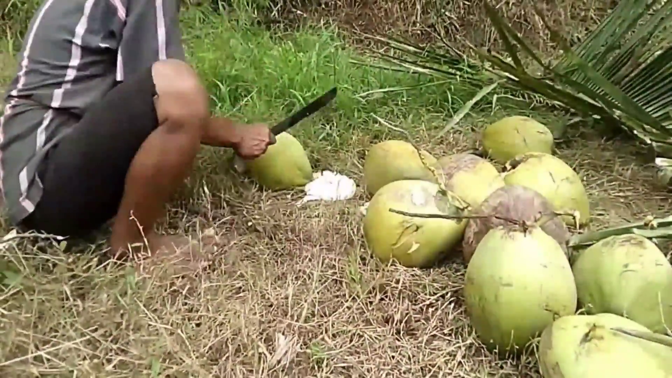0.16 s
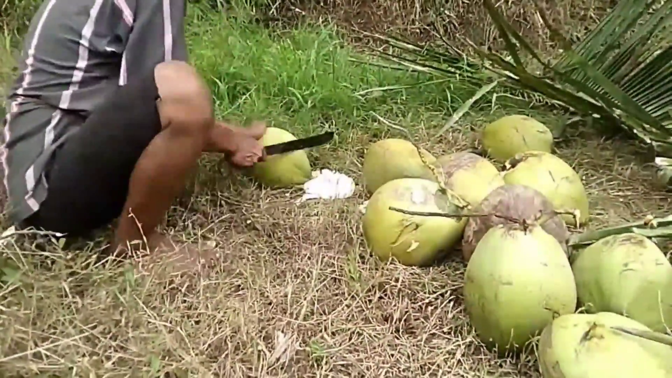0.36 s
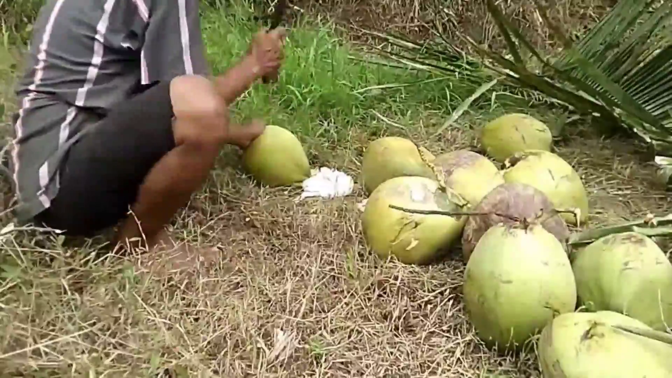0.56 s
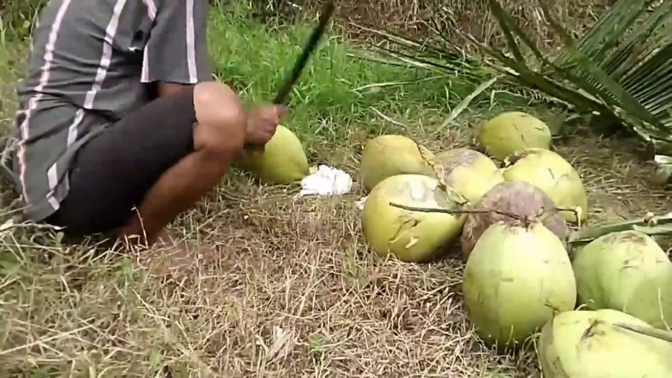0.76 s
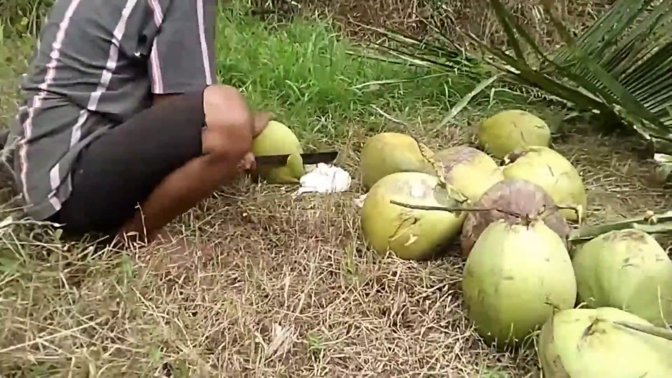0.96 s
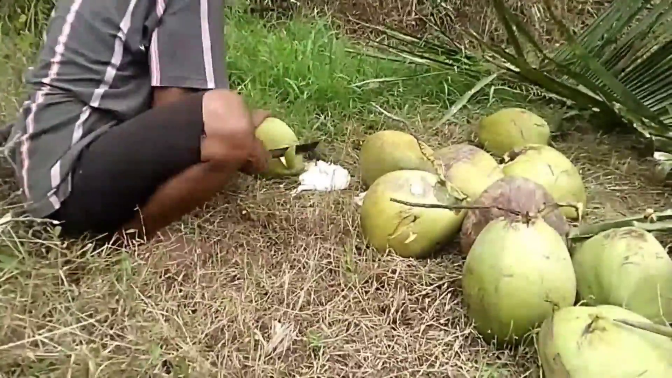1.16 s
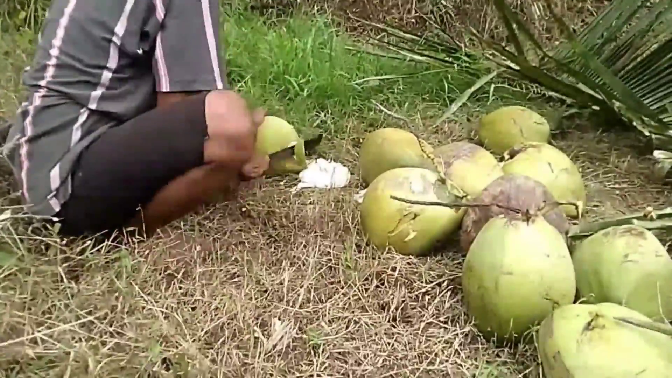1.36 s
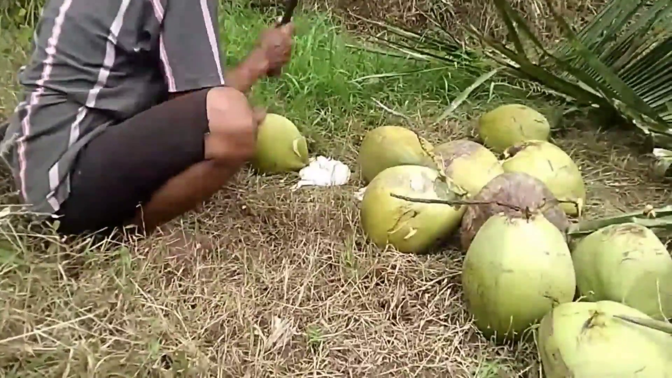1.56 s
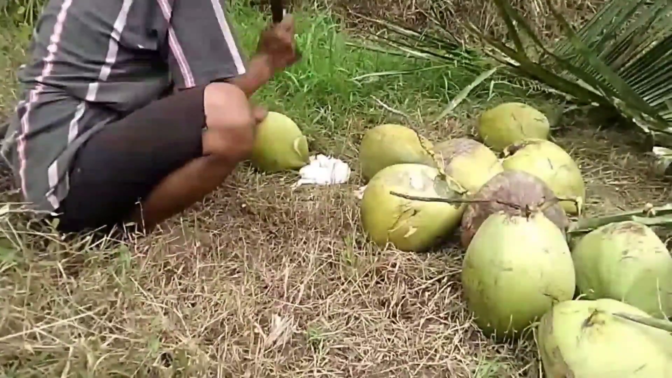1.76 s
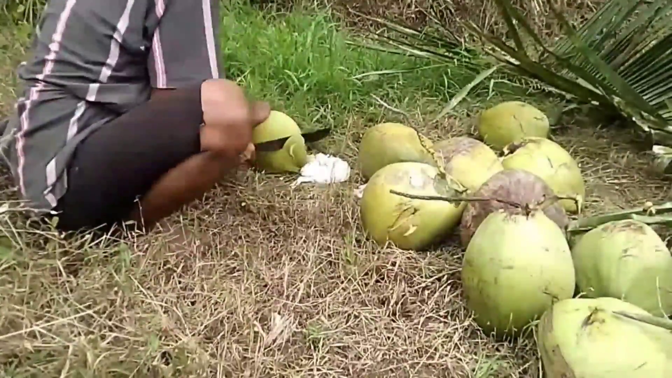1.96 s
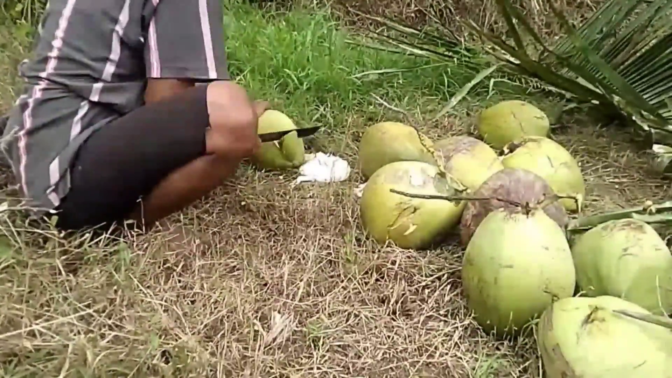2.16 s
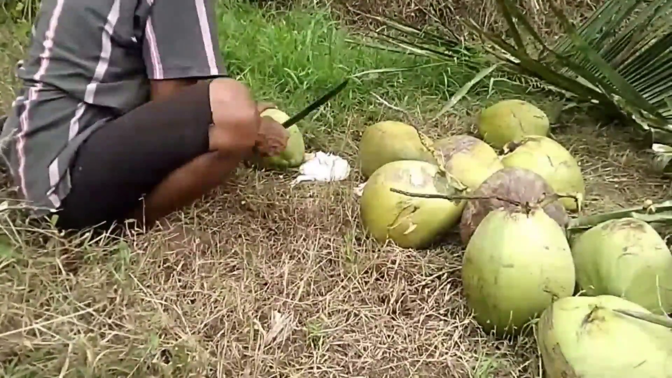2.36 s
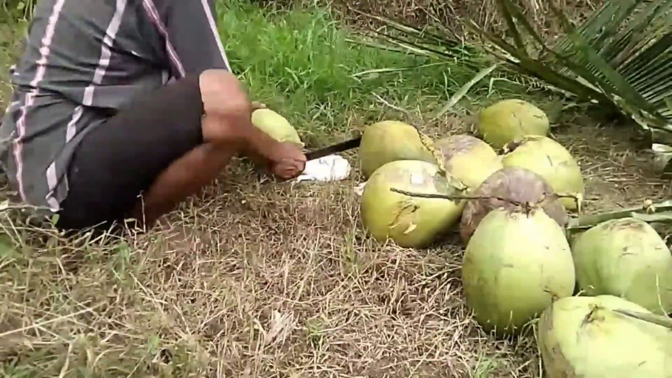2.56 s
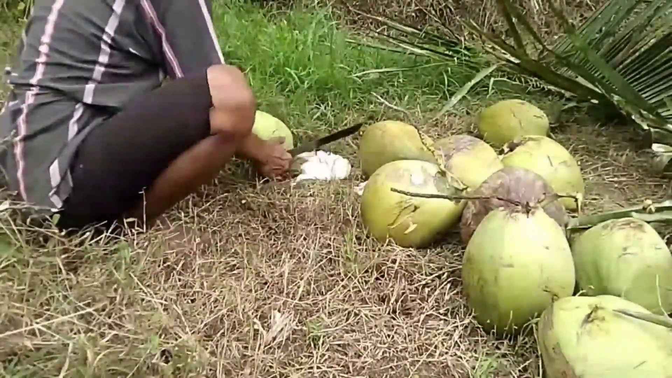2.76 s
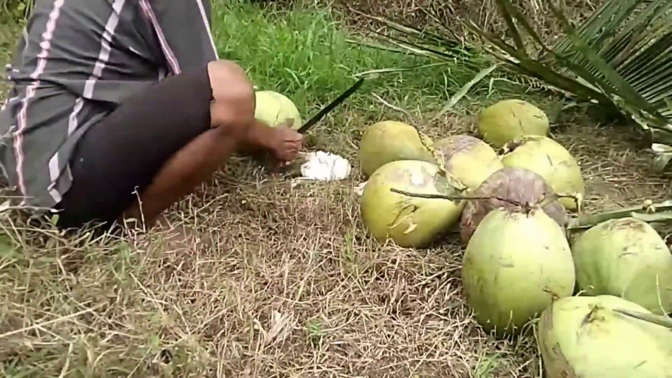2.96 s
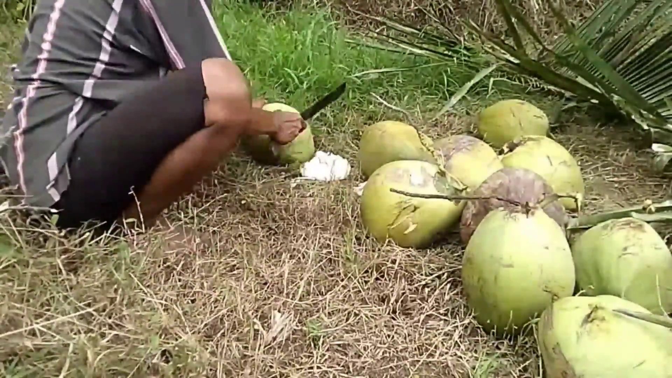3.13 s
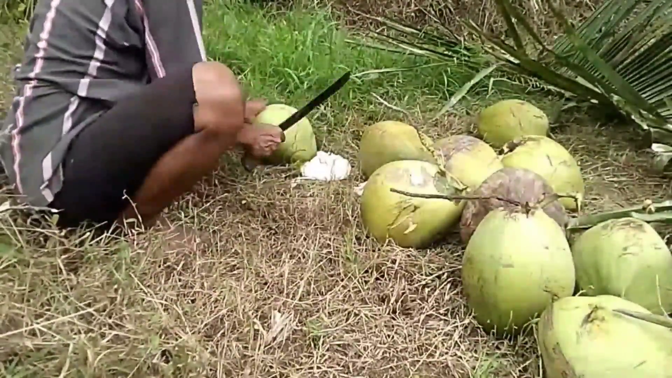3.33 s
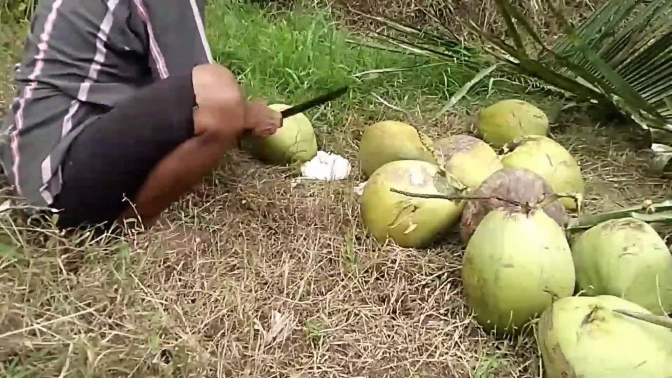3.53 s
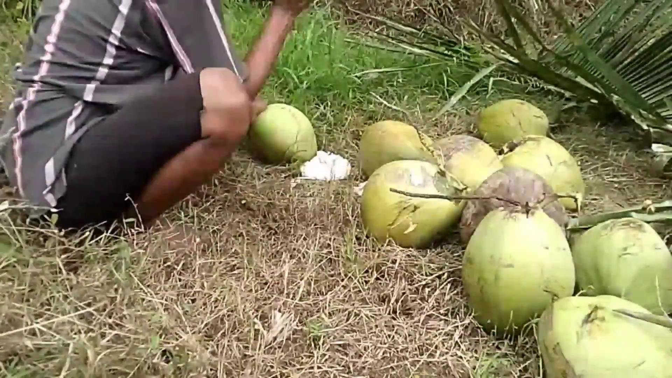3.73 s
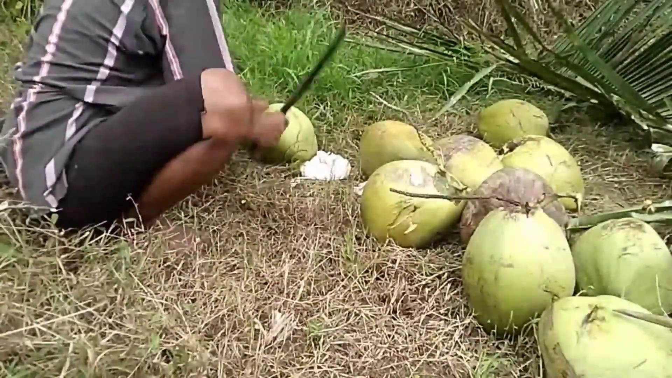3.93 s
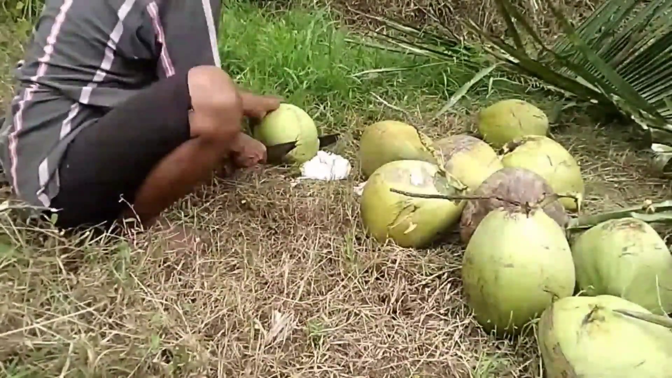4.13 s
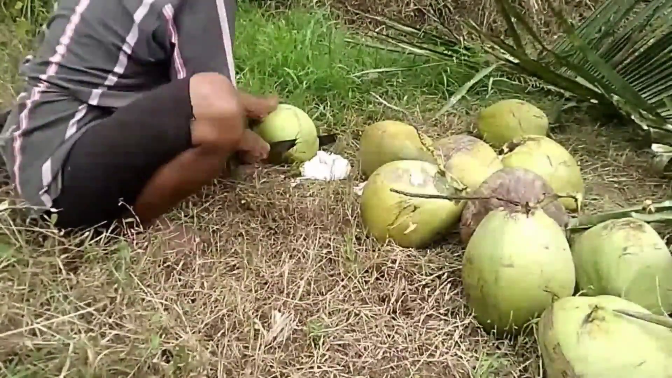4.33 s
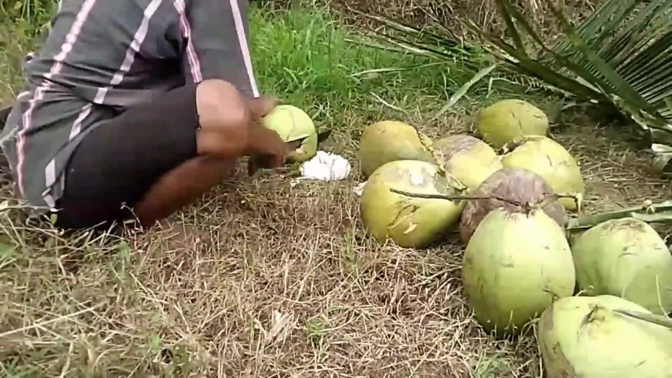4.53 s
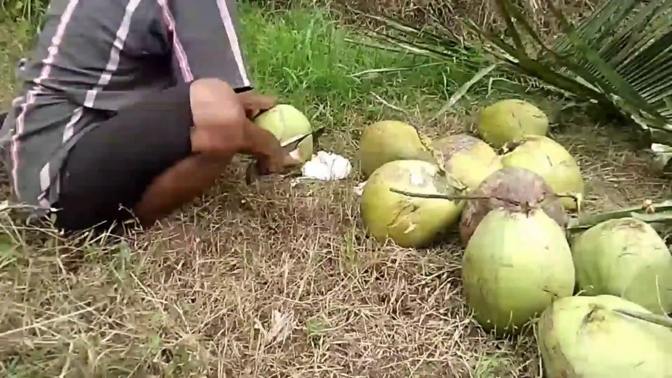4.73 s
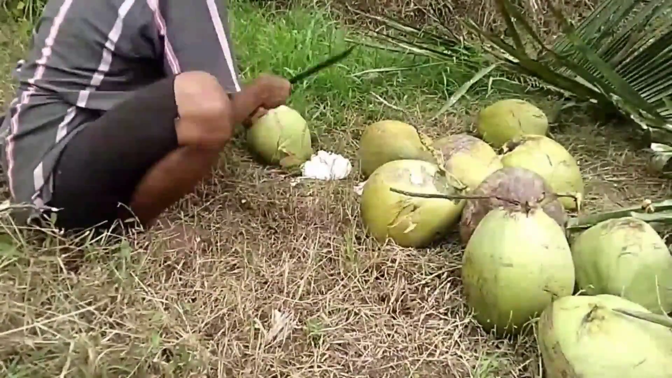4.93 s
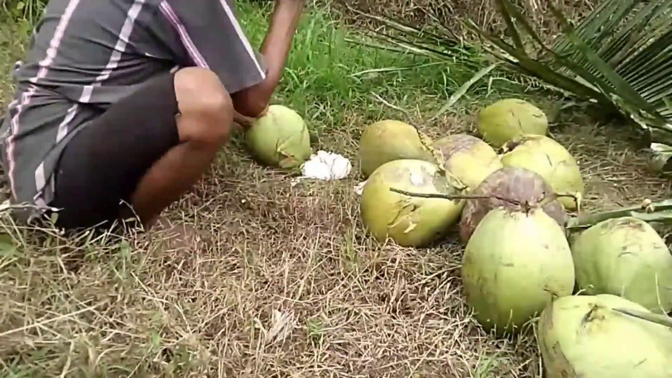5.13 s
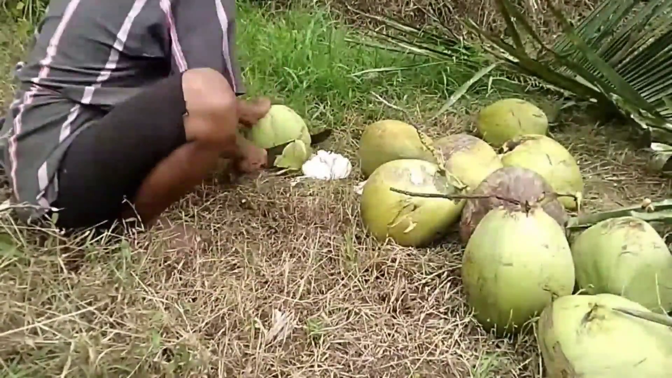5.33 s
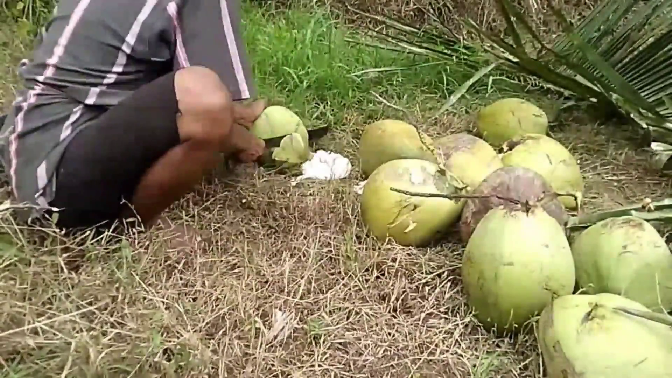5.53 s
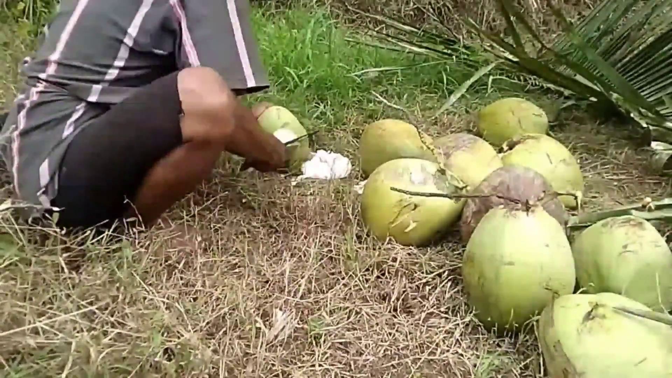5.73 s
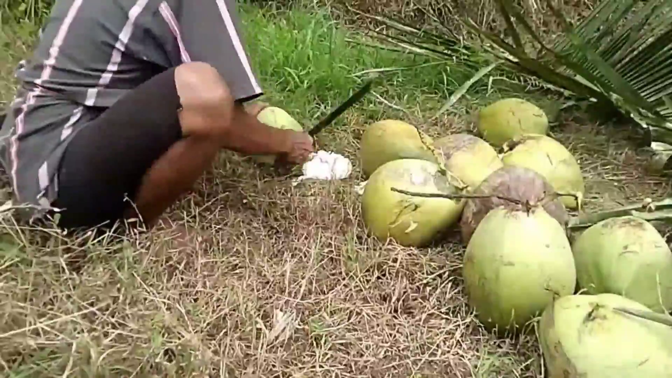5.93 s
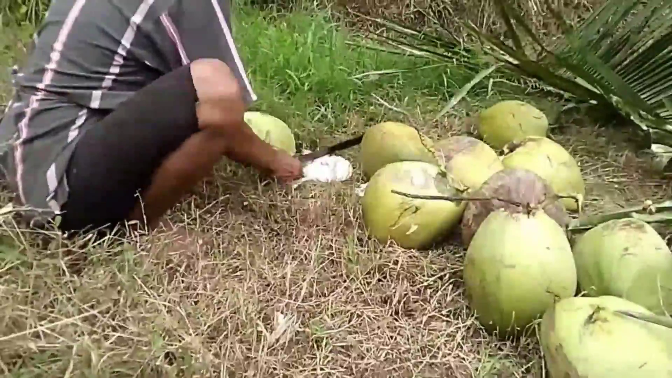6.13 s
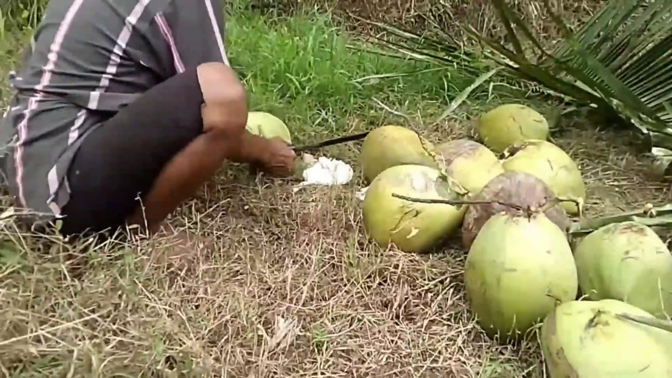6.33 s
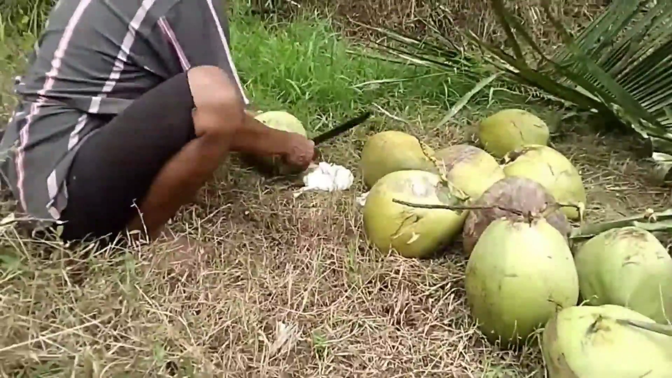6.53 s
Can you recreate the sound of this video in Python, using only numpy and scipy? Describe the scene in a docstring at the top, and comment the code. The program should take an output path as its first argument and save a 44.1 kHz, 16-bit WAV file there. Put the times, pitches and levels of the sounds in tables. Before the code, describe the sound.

Faint grass rustling and a distant bird whistle come first, then a weak machete tap and stronger chops into a moist coconut husk. Levered fibres crackle and rip after several cuts, the nut is shifted with low knocks, and more chops follow, ending in a brittle tear. High katydid whine and fading hiss continue throughout, with low wind rumble on the microphone. Open air, fairly close, dry, with a brief scatter from bushes.

```python
"""Insects whine over hiss and a breeze that swells, gusts once and fades; grass rustles, a knock, a far whistle.
Then six machete blows on a green coconut: filtered modes thud in the nut, and the husk cracks as shaped noise.
After four of them the blade prises the fibres apart: clumped random pings, fizz, rasp and single snaps.
Straw ticks, soft knocks, insect buzzes and two more whistles fall in between.
Grass and bushes scatter the work and the bird through noise echoes."""
import sys
import numpy as np
from scipy import signal
from scipy.fft import rfft, irfft
from scipy.io import wavfile
from scipy.ndimage import uniform_filter1d

SR = 44100
rng = np.random.default_rng(int(sys.argv[2]) if len(sys.argv) > 2 else 0)


def master_out(mix):
    """Clip the mix to full scale and print it as 16-bit PCM to the path in sys.argv[1]."""
    frames = np.transpose(np.atleast_2d(mix))
    ceiling = np.clip(frames, -1, 1)
    pcm = np.round(ceiling * 32767).astype(np.int16)
    wavfile.write(sys.argv[1], SR, pcm)


N = 290619
TIME_S = np.arange(N) / SR

# hiss colour: f/Hz, relative density/dB
HISS_SHAPE = [(300, -3), (700, -29), (1200, -19), (2000, -12), (2700, -4), (4000, -13.5), (5800, -13),
              (8000, -0.5), (10500, 4.5), (12500, 1), (15300, 11.5)]
# hiss level before its flicker: t/s, level/dB
HISS_LEVEL = [(0, -48.5), (1.1, -51.5), (2.6, -54), (4.2, -57.5), (6.59, -57.5)]
# breeze rumble colour: f/Hz, relative density/dB
RUMBLE_SHAPE = [(15, -11.5), (35, -4.5), (60, 2), (130, 7), (200, -2.5), (300, -10.5), (430, -28),
                (900, -60)]
# breeze strength: t/s, relative level/dB
BREEZE = [(0, -11), (1.2, 1.5), (3.1, 3.5), (3.8, -3.5), (4.7, -5), (6.1, -12), (6.59, -18)]
GUST_AT_S, GUST_HALF_S, GUST_DB = 3.26, .12, 13
PUFFS_DB, RUMBLE_DB = -64.5, -62.5  # at breeze 0 dB
RUMBLE_SHARE = 0.21  # of the breeze's dB swings

# near katydids: crest t/s, cycle/s, crest f/Hz, drift over the scene/Hz, first and last mean level/dB
KATYDIDS = [(.36, 1.065, 14060, -200, -50.5, -67), (.62, 1.115, 13960, 60, -60, -64),
            (1.1, 1.1, 13900, -30, -64, -63), (.2, 1.1, 13760, -200, -67, -69),
            (0, 1.1, 13330, -70, -77, -70.5)]
KATYDID_SWING_HZ, KATYDID_RISE = 190, .36  # rise: share of the cycle
FAR_KATYDID_LOW_HZ, FAR_KATYDID_HIGH_HZ = 13250, 14400  # range of crests
FAR_KATYDID_FIRST_DB, FAR_KATYDID_LAST_DB = -69, -76
# steady flickering noise bands: f/Hz, width/Hz, mean level/dB
NOISE_BANDS = [(3364, 130, -79.5), (3522, 130, -77), (4703, 380, -78.5), (6890, 400, -80.5),
               (13650, 850, -73)]
# short insect buzzes: t/s, length/s, level/dB
BUZZES = [(1.638, 0.2, -63), (1.891, 0.13, -65), (4.173, 0.2, -62.5)]

# feet and hands shifting in dry grass: middle t/s, half length/s, level/dB
SHUFFLES = [(0.112, 0.097, -69.5), (0.744, 0.44, -75), (1.39, 0.33, -77.5), (2.375, 0.059, -64.5),
            (2.74, 0.12, -65.5), (2.99, 0.091, -71), (3.194, 0.21, -83), (4.94, 0.72, -86)]
RUSTLE_FLOOR_DB = -78

# nut turned and set down: t/s, level/dB, centre f/Hz, decay/s
KNOCKS = [(0.1177, -62, 1390, .01), (2.5452, -63, 510, .02), (2.655, -53, 800, .005),
          (2.664, -53.5, 1400, .005), (2.699, -48, 130, .012), (2.705, -53, 1100, .003),
          (2.8081, -56, 750, .016), (3.188, -44, 65, .02), (3.242, -46, 110, .025), (3.318, -50, 100, .015),
          (4.6529, -45, 510, .007), (4.69, -45.5, 497, .012), (5.097, -61, 1150, .005),
          (5.115, -63, 1200, .009)]
# thick fibres and bundles snapping: t/s, level/dB, centre f/Hz, decay/s
SNAPS = [(1.2008, -46, 9000, .003), (1.216, -47, 3900, .004), (1.2385, -38.5, 3900, .004),
         (1.257, -40, 10500, .004), (1.2722, -37, 9500, .003), (1.283, -39, 3800, .002),
         (1.296, -41, 3900, .002), (1.3125, -41, 12000, .002), (2.2605, -41, 2850, .006),
         (2.2805, -38.5, 2780, .007), (2.2895, -43, 9000, .002), (2.302, -44, 2950, .008),
         (2.3222, -39.5, 2800, .004), (2.323, -42, 9500, .003), (2.3427, -41, 8500, .003),
         (4.4935, -45, 9000, .002), (4.525, -43, 11500, .002), (4.581, -37, 3200, .002),
         (4.6225, -35, 9500, .003), (4.628, -32, 8800, .005), (4.6302, -25, 9500, .0005),
         (4.638, -34, 9500, .004), (4.655, -36, 9000, .002), (4.6985, -35, 9000, .002),
         (5.7625, -42, 9000, .002), (5.7675, -39, 3200, .003), (5.7815, -38, 3000, .002),
         (5.7875, -37, 3400, .002), (5.7928, -34, 3400, .002), (5.8083, -24.5, 4200, .001),
         (5.8095, -31, 3000, .005), (5.829, -39, 4000, .004), (5.872, -40, 10000, .005)]
# dry straws ticking underfoot: t/s, level/dB
STRAWS = [(0.5717, -42), (1.4265, -47), (1.7086, -43), (1.878, -37), (2.9119, -47), (3.0072, -48)]
STRAW_HZ, STRAW_DECAY_S = 10000, .0013

# bird: start t/s, length/s, base f/Hz, glide/(Hz/s), base level/dB, level change start to end/dB
WHISTLES = [(0.25, .24, 3215, -260, -59.5, 0), (2.73, .305, 3345, -160, -55.5, 7),
            (5.897, 0.22, 3396, 900, -64, -10)]
WHISTLE_ARCH_HZ, WHISTLE_DIP_DB = 80, 4  # the dip is mid-whistle

# blows: t/s, relative thud level/dB, softness cutoff f/Hz, factor on nut pitch,
# wait to ground/s, ground push re first/dB, relative soil thump/dB, thump f/Hz,
# wait to split/s, split jolt re first push/dB, relative crack level/dB, crack decay/s,
# crack body below treble/dB, flap f/Hz, flap level re crack/dB, crack left minus right/dB
CHOPS = [(0.4406, -31.3, 400, .96, .0043, -11, -51.5, 168, .0087, -10, -41, .0054, -4, 2500, -20, 4),
         (0.9561, -28, 620, .952, .0043, -2.7, -32.6, 142, .0079, 6.7, -21.5, .0062, -3, 2430, -14, 5),
         (2.0006, -26.7, 840, .948, .0026, -3.8, -30.8, 257, .008, 4.5, -19.5, .0054, 4, 3250, -11, 3),
         (3.5937, -39, 550, .984, .0045, 4.4, -52.3, 155, .0066, -1, -34.3, .0055, -7.5, 1300, -19, 5.5),
         (4.0893, -22.5, 1500, .988, .0042, -4.1, -33, 85, .0081, 2.3, -18.5, .0064, 6.5, 2550, -11, 2.5),
         (5.4321, -26, 820, .963, .004, -1.6, -39, 165, .008, 4.7, -21.8, .0066, 3.5, 3550, -11, 2.5)]
# nut with its milk: f/Hz before the pitch factor, relative level/dB, t60/s
NUT_MODES = [(208, -6, .055), (308, -2.6, .034), (505, -6.3, .048), (670, -9, .045), (743, 1.1, .042),
             (901, .7, .038), (998, -6, .048)]
# steel blade damped by the cut: nominal f/Hz, relative level/dB, t60/s
BLADE_MODES = [(4400, -9, 0.035), (7960, 0, 0.029), (9000, -3, 0.032), (10000, -5, 0.035)]
# splitting husk colour: f/Hz, relative density before the body tilt/dB
CRACK_SHAPE = [(60, -14.5), (160, 4), (320, -3), (400, -10), (600, -5), (950, -3), (1200, -.5), (1550, -5),
               (1900, -1.5), (2200, -7), (2600, -4), (3000, -4.5), (3800, 1), (4600, 1), (5500, -4.5),
               (7000, 0), (9300, 7.5), (15500, 1)]
# crumbs of husk: f/Hz, relative ping level/dB
CHIPS_SHAPE = [(600, 1), (1500, 4.5), (3000, -5.5), (6000, 3), (10000, 5.5), (14000, -4)]
CHIPS_DB, CHIPS_AT_S, CHIPS_PER_S = -24, .018, 3000  # level re crack; peak time
CRACK_LAG_S, CRACK_RISE_S = .0008, .00045
LEAD_IN_DB, LEAD_IN_RISE_S = -21, .001  # re crack
SOIL_T60_S, FLAP_T60_S = .035, .028
FLAP_OVERTONE, FLAP_OVERTONE_DB = 1.5, -3  # re the flap's first mode

# pulls on the blade: husk gives at t/s, relative level/dB, build-up/s, release/s,
# crest exponent (1 pointed, 3 flat), factor on fibre pitch, rasp/dB, fizz/dB (both re fibres)
PULLS = [(1.282, -48.5, 0.11, 0.1, 1.8, 1.2, -7.5, 5.5), (2.288, -49, .072, .08, 2, 1.02, -17, 3),
         (2.385, -57, 0.05, 0.055, 1.8, 1.05, -9, 7.5), (4.628, -47.5, .17, 0.12, 1.3, 1.05, -8, 6),
         (4.632, -48, .02, .09, 1.3, 1.1, -3, 7.5), (4.7, -51, .06, .075, 1.4, 1.05, 0, 8.5),
         (5.8, -46, 0.105, .09, 1.45, 0.9, 1, 4.5), (5.868, -54, .04, .028, 1.5, 1, -3, 5)]
# fibre pings: f/Hz before the pitch factor, relative level/dB
FIBRES_SHAPE = [(2000, -31), (2400, 0), (2700, -1), (3100, -4.5), (3800, 3), (4700, -5.5), (5500, -3),
                (6500, -37)]
# low rasp colour: f/Hz, relative density/dB
RASP_SHAPE = [(200, -9), (500, -2.5), (1000, 1), (2000, 5), (3000, 2)]
# bright fizz colour: f/Hz, relative density/dB
FIZZ_SHAPE = [(4500, -21.5), (6500, -9.5), (8200, -0.5), (11000, -1.5), (14000, -1.5), (15500, -9)]
RASP_LAG_S, FIZZ_LAG_S = 0.026, 0.0044  # the fibres go first, then the blade slides through the wet husk
FIBRES_PER_S, CLUMPS_PER_S, CLUMP_DB = 5000, 260, 2.6
PULL_RANGE_DB = 26  # swell over the build-up, fall over the release
PATCH_DB, PATCH_HZ, PATCH_S = 2.2, 500, .012

# two microphone ports: f/Hz, left phase lag/rad, left minus right/dB
PORTS = [(100, 0, .5), (500, 0, 2), (600, 0, 2), (1150, 1.5, .7), (2800, 1.1, 2.3), (5500, 1.6, .2),
         (10000, 1.85, 0), (14000, 2, -.3)]
EDGE_HZ = 15570


def gain_of(db):
    """Decibels to gain."""
    return 10 ** (np.asarray(db) / 20)


def evened(x):
    """Scaled to rms 1."""
    return x / np.sqrt(np.mean(x ** 2) + 1e-20)


def add(mix, at_s, sound):
    """Adds a sound to the mix at a time, cut at the mix's end."""
    part = mix[:, max(round(at_s * SR), 0):][:, :sound.shape[-1]]
    part += sound[..., :part.shape[1]]


def panned(db):
    """Left and right gains for a level difference."""
    return gain_of(np.array([[db], [-db]]) / 2)


def colour(x, points):
    """Minimum-phase filter of unit energy through (f/Hz, level/dB) points."""
    size = 4096
    hz, db = np.transpose(points)
    log_f = np.log(abs(np.fft.fftfreq(size, 1 / SR)) + 1)
    log_gain = np.log(gain_of(np.interp(log_f, np.log(hz), db)))
    spectrum = np.exp(np.conj(signal.hilbert(log_gain)))
    taps = np.fft.ifft(spectrum).real[:size // 2]
    taps = taps / np.linalg.norm(taps)
    return signal.oaconvolve(x, taps[None], axes=1)[:, :x.shape[1]]


def pair(n, likeness, grain_db=0):
    """Two partly alike noises; grain_db makes some samples stand out as tiny snaps."""
    a, b = rng.standard_normal((2, n))
    c = np.clip(likeness, -1, 1)
    noises = np.array([a, c * a + np.sqrt(1 - c * c) * b])
    grains = gain_of(grain_db * np.minimum(rng.exponential(1, n), 4))
    return evened(noises * grains)


def band(x, hz, width_hz):
    """Bell-shaped band of x at rms 1."""
    f = np.fft.rfftfreq(x.shape[-1], 1 / SR)
    bell = np.exp(-2 * ((f - hz) / width_hz) ** 2)
    return evened(irfft(rfft(x) * bell, x.shape[-1]))


def drift(n, rate_hz):
    """Random knots of unit spread, joined by lines."""
    knots = np.arange(n) / SR * rate_hz
    return np.interp(knots, np.arange(N // 10), rng.standard_normal(N // 10))


def swell(at_s, half_s):
    """Smooth bump of height 1 around a time."""
    return np.exp(-((TIME_S - at_s) / half_s) ** 2)


def air():
    """Fine, fading hiss; one breeze drives low rumble and puffs on the microphone."""
    hiss_db = np.interp(TIME_S, *np.transpose(HISS_LEVEL)) + .6 * drift(N, 14)
    hiss = colour(pair(N, .3), HISS_SHAPE) * gain_of(hiss_db) * panned(4.5)
    breeze_db = np.interp(TIME_S, *np.transpose(BREEZE)) + GUST_DB * swell(GUST_AT_S, GUST_HALF_S)
    rumble_db = RUMBLE_DB + RUMBLE_SHARE * breeze_db + 2.8 * drift(N, 14)
    rumble = colour(pair(N, .8), RUMBLE_SHAPE) * gain_of(rumble_db) * panned(3)
    puffs = colour(pair(N, 0), [(12, -8), (30, -13.5), (60, -11.0), (140, -29), (400, -80.0)])
    puffs_db = PUFFS_DB + breeze_db + 5.7 * drift(N, 2.5)
    return hiss + rumble + puffs * gain_of(puffs_db) * panned(-2.2)


def katydid(crest_s, cycle_s, hz, drift_hz, first_db, last_db):
    """Thin sine whine that climbs quickly and sinks slowly, shimmering on its way through the leaves."""
    phase = (TIME_S - crest_s) / cycle_s % 1
    sag = np.interp(phase, [0, 1 - KATYDID_RISE, 1], [0, 1, 0])
    pitch_hz = hz + np.linspace(0, drift_hz, N) - KATYDID_SWING_HZ * sag + 14 * drift(N, 300)
    turns = np.cumsum(pitch_hz) / SR
    level_db = np.linspace(first_db, last_db, N)
    level_db = level_db + 3 * np.array([drift(N, 16), drift(N, 12)]) + 2.5 * drift(N, 40)
    path_turns = .22 * np.array([drift(N, 9), drift(N, 7)])
    return gain_of(level_db) * np.sin(2 * np.pi * (turns + path_turns)) * panned(5.0)


def insects(far_count=8):
    """Near and far katydid sines over steady flickering noise bands and short noise buzzes."""
    far = [(rng.random(), rng.uniform(1, 1.2), hz, 0, FAR_KATYDID_FIRST_DB, FAR_KATYDID_LAST_DB)
           for hz in np.linspace(FAR_KATYDID_LOW_HZ, FAR_KATYDID_HIGH_HZ, far_count)]
    out = sum(katydid(*row) for row in KATYDIDS + far)
    for hz, width_hz, db in NOISE_BANDS:
        out += gain_of(db + 2.4 * drift(N, 45)) * band(pair(N, 0.069), hz, width_hz) * panned(10)
    for at_s, length_s, db in BUZZES:
        n = round(length_s * SR)
        buzz = band(pair(n, 0.18), 7870, 1000) * signal.windows.tukey(n, .7)
        add(out, at_s, gain_of(db) * buzz * panned(4.0))
    return out


def shuffle():
    """Trodden grass: grainy, uneven noise that swells with each shift of weight."""
    grass = colour(pair(N, 0.028, grain_db=3.5),
                   [(150, -6.5), (300, 5.5), (450, -5.5), (650, -1.5),
                    (1100, -13.0), (1600, -6.0), (2600, -13.5), (5000, -17.5)])
    weight = gain_of(RUSTLE_FLOOR_DB) + sum(gain_of(db) * swell(at_s, half_s) for at_s, half_s, db in SHUFFLES)
    return grass * weight * gain_of(2.5 * drift(N, 110)) * panned(7)


def bursts(rows, skirt_db, pan_db):
    """Knocks, snaps or ticks: decaying grainy noise, each around its own centre frequency."""
    out, t = np.zeros((2, N)), np.arange(SR // 10) / SR
    for at_s, db, hz, decay_s in rows:
        shape = [(hz / 4, 2 * skirt_db), (hz / 1.6, skirt_db), (hz, 0),
                 (hz * 2, skirt_db), (hz * 8, 3 * skirt_db), (hz * 64, 6 * skirt_db)]
        grains = pair(len(t), 0.052, grain_db=2.5) * np.exp(-t / decay_s)
        add(out, at_s, gain_of(db) * colour(grains, shape))
    return out * panned(pan_db)


def bird():
    """Far, thin whistle: a wavering sine on one arch of pitch and amplitude."""
    out = np.zeros((2, N))
    for at_s, length_s, hz, glide, db, change_db in WHISTLES:
        t = np.arange(0, length_s, 1 / SR)
        arch = np.sin(np.pi * t / length_s)
        pitch_hz = hz + glide * (t - length_s / 2) + WHISTLE_ARCH_HZ * (arch - .75) + 24 * drift(len(t), 170)
        level_db = db + change_db * (t / length_s - .5) - WHISTLE_DIP_DB * arch ** 16
        level_db = level_db + 2.8 * drift(len(t), 110)
        tone = np.sin(2 * np.pi * np.cumsum(pitch_hz) / SR)
        add(out, at_s, arch * gain_of(level_db) * tone * panned(6.1))
    return out


def ring(modes, t, pitch=1):
    """Decaying sine modes after one sharp push."""
    return sum(gain_of(db - 60 * t / t60) * np.sin(2 * np.pi * hz * pitch * t) for hz, db, t60 in modes)


def crackle(n, points, per_s, count=40):
    """Fibres of many sizes snap at random, each ringing a few cycles at its own pitch."""
    hz, db = np.transpose(points)
    out, t = np.zeros((2, n)), np.arange(SR // 100) / SR
    for f in np.linspace(hz[0], hz[-1], count) * rng.uniform(.97, 1.03, count):
        snaps = pair(n, 0.6) * (rng.random(n) < per_s / count / SR)
        envelope = (t * f) * np.exp(-t * f / 2.2)
        ping = gain_of(np.interp(f, hz, db)) * np.sin(2 * np.pi * f * t) * envelope
        out += signal.oaconvolve(snaps, ping[None], axes=1)[:, :n]
    return evened(out)


def chops():
    """Three pushes ring the nut: blade lands, nut thumps the soil, husk splits and sheds crumbs."""
    out, t = np.zeros((2, N)), np.arange(SR // 5) / SR
    cushion = np.vstack([signal.butter(2, 75, "high", fs=SR, output="sos"),
                         signal.butter(5, 1300, fs=SR, output="sos")])
    for (at_s, thud_db, soft_hz, pitch, ground_wait_s, ground_db, thump_db, thump_hz,
         split_wait_s, jolt_db, crack_db, decay_s, body_db, flap_hz, flap_db, pan_db) in CHOPS:
        contact = np.vstack([cushion, signal.butter(3, soft_hz, fs=SR, output="sos")])
        nut = signal.sosfilt(contact, ring(NUT_MODES, t, pitch))
        thud = -gain_of(thud_db - 6) * nut * panned(6)
        for delay_s, push_db in [(0, 0), (ground_wait_s, ground_db), (split_wait_s, jolt_db)]:
            add(out, at_s + delay_s, gain_of(push_db) * thud)
        soil = signal.sosfilt(cushion, ring([(thump_hz, thump_db, SOIL_T60_S)], t))
        add(out, at_s + ground_wait_s, soil * panned(5))

        split = pair(len(t), 0.61) * (1 - np.exp(-t / CRACK_RISE_S)) * np.exp(-(t / decay_s) ** 1.6)
        # a faint noise swells into the split
        lead_in = pair(len(t), .6, grain_db=2) * gain_of(LEAD_IN_DB) * np.exp((t - t[-1]) / LEAD_IN_RISE_S)
        husk = [(hz, db + body_db / (1 + (hz / 5500) ** 4)) for hz, db in CRACK_SHAPE]
        spray = t / CHIPS_AT_S * np.exp(-t / CHIPS_AT_S)
        chips = gain_of(CHIPS_DB) * crackle(len(t), CHIPS_SHAPE, CHIPS_PER_S) * spray
        steel = gain_of(-13.5) * ring(BLADE_MODES, t, rng.uniform(.97, 1.03))  # pitch varies per blow
        flap = ring([(flap_hz, flap_db, FLAP_T60_S),
                     (flap_hz * FLAP_OVERTONE, flap_db + FLAP_OVERTONE_DB, FLAP_T60_S)], t)
        split_s = at_s + split_wait_s + CRACK_LAG_S
        gains = gain_of(crack_db + 2.5) * panned(pan_db)
        add(out, split_s - t[-1], gains * colour(lead_in, husk))
        add(out, split_s, gains * (colour(split, husk) + steel + flap + chips))
    return out


def strain(t, build_s, release_s, crest):
    """Gain that swells until the husk gives at t = 0, then falls away."""
    return gain_of(-PULL_RANGE_DB * np.maximum(-t / build_s, t / release_s) ** crest)


def patchy(x, size=256):
    """Random time-frequency patches make the noise louder and softer in separate bands."""
    hop = size // 4
    z = signal.stft(x, nperseg=size, noverlap=3 * size // 4)[2]
    field = rng.standard_normal(z.shape[1:])
    field = uniform_filter1d(field, round(PATCH_HZ * size / SR), axis=0)
    field = evened(uniform_filter1d(field, round(PATCH_S * SR / hop), axis=1))
    patched = z * evened(gain_of(PATCH_DB * field))
    return signal.istft(patched, nperseg=size, noverlap=3 * size // 4)[1][:, :x.shape[1]]


def tears():
    """Levered fibres part in clumps of tiny snaps; fizz and rasp noise follow just behind."""
    out = np.zeros((2, N))
    for at_s, db, build_s, release_s, crest, pitch, rasp_db, fizz_db in PULLS:
        t = np.arange(-2 * build_s, 2 * release_s + RASP_LAG_S, 1 / SR)
        fibres = [(hz * pitch, level_db) for hz, level_db in FIBRES_SHAPE]
        sound = strain(t, build_s, release_s, crest) * crackle(len(t), fibres, FIBRES_PER_S)
        for shape, layer_db, lag_s in [(RASP_SHAPE, rasp_db, RASP_LAG_S), (FIZZ_SHAPE, fizz_db, FIZZ_LAG_S)]:
            noise = colour(pair(len(t), 0.7, grain_db=3.5), shape)
            sound += gain_of(layer_db) * strain(t - lag_s, build_s, release_s, crest) * noise
        clumps = gain_of(CLUMP_DB * drift(len(t), CLUMPS_PER_S))
        add(out, at_s + t[0], gain_of(db) * clumps * patchy(sound) * panned(1.76))
    return out


def thicket(x):
    """Grass scatters the sound at once; bushes behind return a soft, later wash."""
    t = np.arange(SR // 2) / SR
    near = pair(len(t), 0.1) * gain_of(-60 * t / 0.09) * (1 - np.exp(-t / 0.0087))
    bushes = pair(len(t), 0.13) * np.exp(-((t - .033) / 0.018) ** 2)
    far = pair(len(t), 0.087) * gain_of(-60 * t / .42) * (1 - .85 * np.exp(-(t / .11) ** 2))
    far = colour(far, [(200, -12.5), (900, -10.5), (2500, -1.5), (15000, -7)])  # leaves return mostly treble
    layers = [(-25, near), (-21.0, bushes), (-27.0, far)]
    taps = sum(gain_of(db) * part / np.linalg.norm(part[0]) for db, part in layers)
    taps = colour(taps, [(100, -2.0), (600, 3.0), (1500, 9.5), (4000, 0.0), (9000, 3.0), (15000, 2.0)])
    return signal.fftconvolve(x, taps, axes=1)[:, :N]


def microphones(x):
    """Two ports hear the work with unequal phase and level at each frequency."""
    hz, lag_rad, balance_db = np.transpose(PORTS)
    f = np.fft.rfftfreq(N, 1 / SR)
    balance = gain_of(np.interp(f, hz, balance_db) / 2)
    left = balance * np.exp(-1j * np.interp(f, hz, lag_rad) / 2)
    return irfft(rfft(x) * np.array([left, 1 / left]), N)


def scene():
    """Work and bird, both scattered by the thicket, over the sounds of the field."""
    ticks = SNAPS + [(at_s, db, STRAW_HZ, STRAW_DECAY_S) for at_s, db in STRAWS]
    small = bursts(KNOCKS, skirt_db=-14, pan_db=5) + bursts(ticks, skirt_db=-20, pan_db=3)
    whistle = bird()
    work = microphones(chops() + tears() + small)
    sent = work + gain_of(6) * whistle  # the distant bird has more echo
    mix_rad = 1.2 * drift(N, 90)  # fast random mixing of echo signs blurs any ring
    echoes = thicket(sent) * np.cos(mix_rad) + thicket(sent) * np.sin(mix_rad)
    return air() + insects() + shuffle() + whistle + work + echoes


def record(dry):
    """The recorder's band limit: a linear-phase low-pass."""
    taps = signal.firwin(401, EDGE_HZ, window=("kaiser", 8), fs=SR)
    return signal.oaconvolve(dry, taps[None], "same")


dry = scene()
out = record(dry)
master_out(out)
```